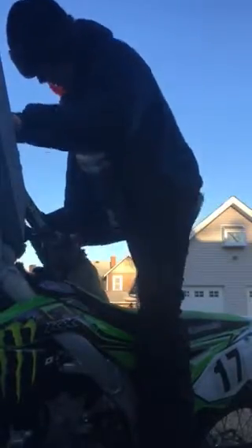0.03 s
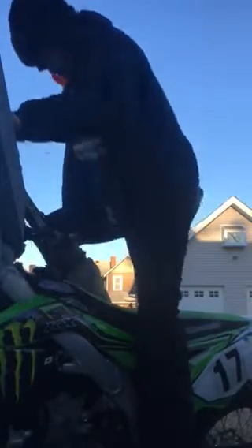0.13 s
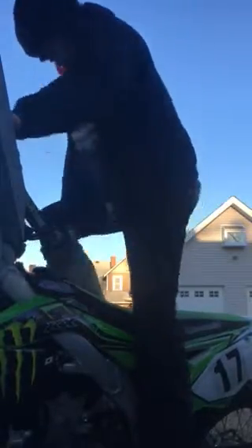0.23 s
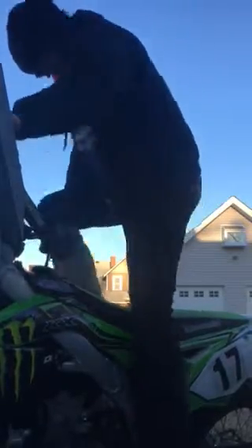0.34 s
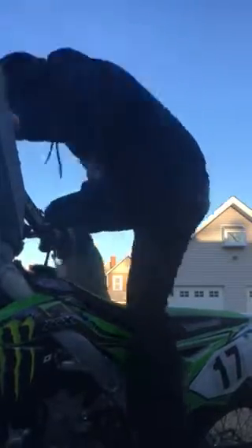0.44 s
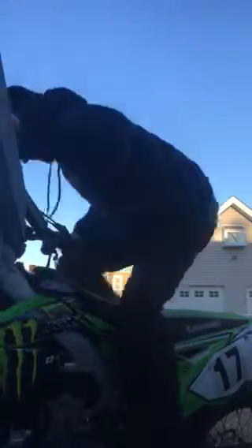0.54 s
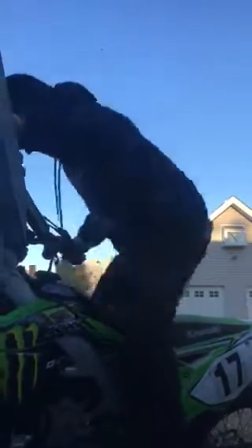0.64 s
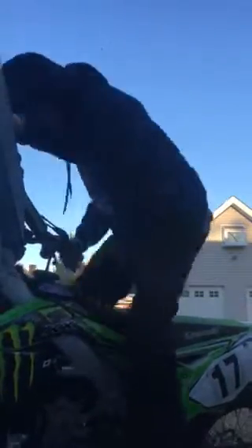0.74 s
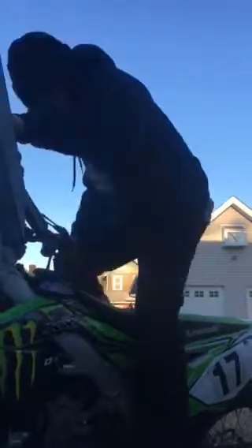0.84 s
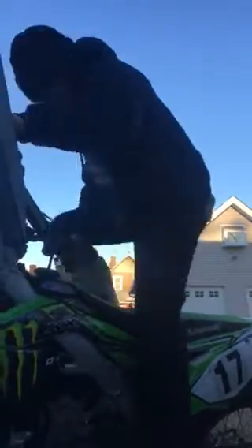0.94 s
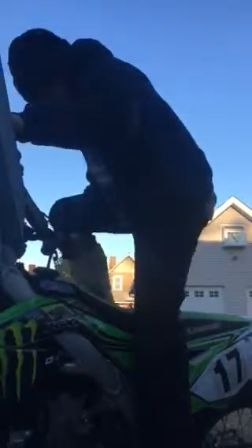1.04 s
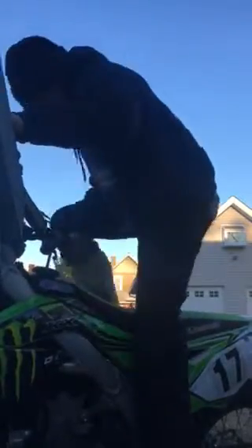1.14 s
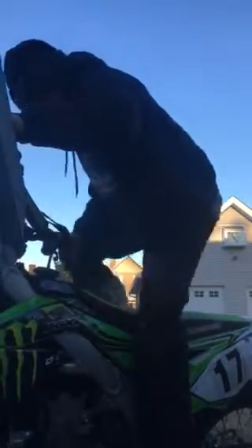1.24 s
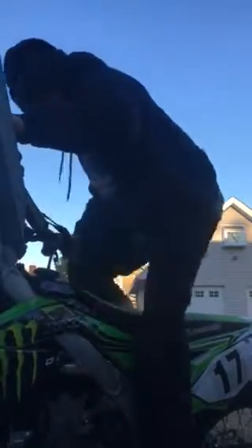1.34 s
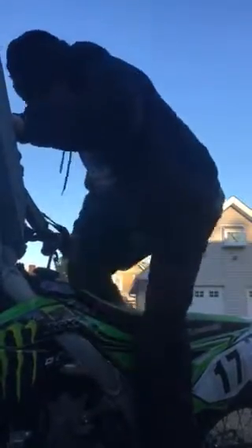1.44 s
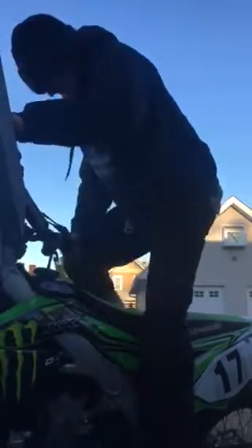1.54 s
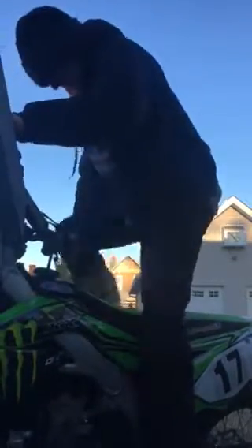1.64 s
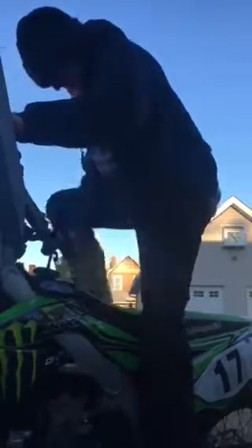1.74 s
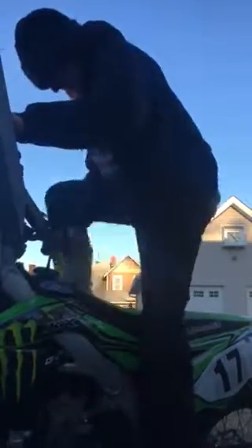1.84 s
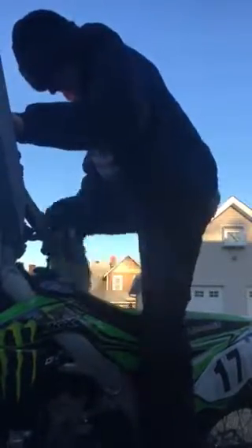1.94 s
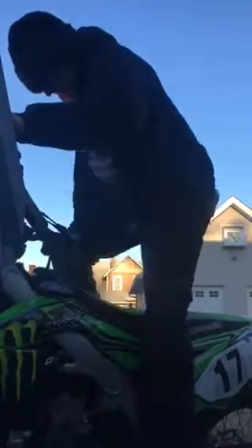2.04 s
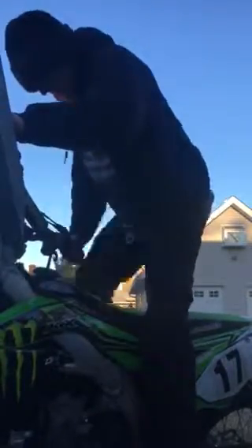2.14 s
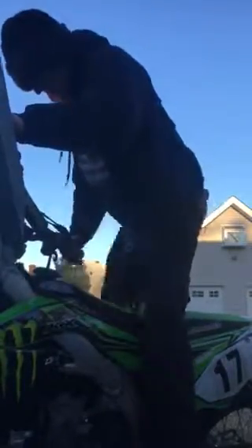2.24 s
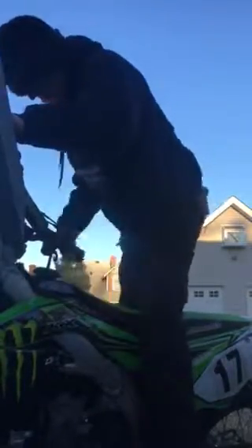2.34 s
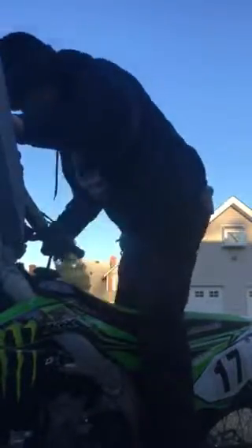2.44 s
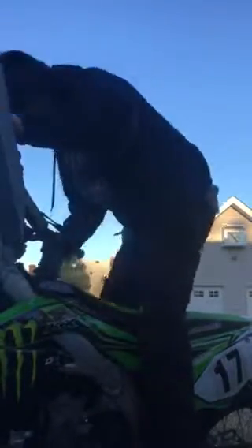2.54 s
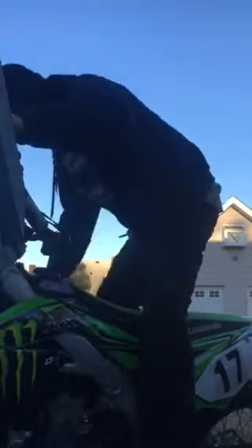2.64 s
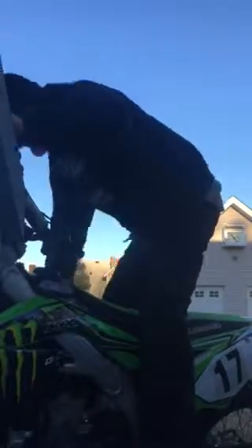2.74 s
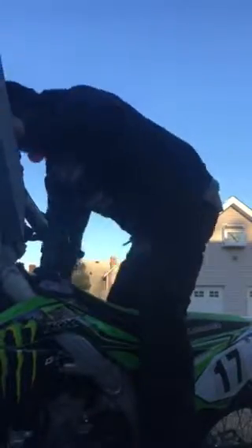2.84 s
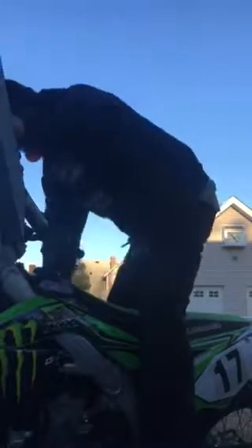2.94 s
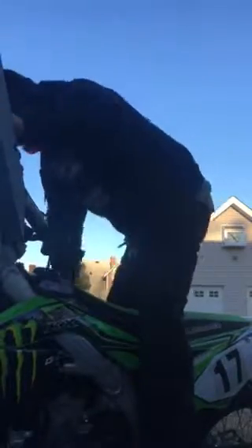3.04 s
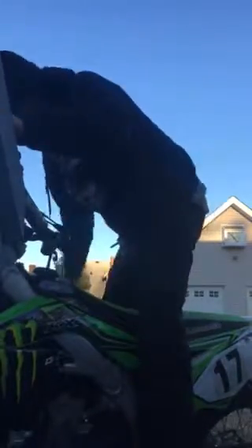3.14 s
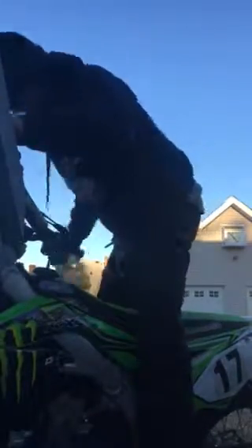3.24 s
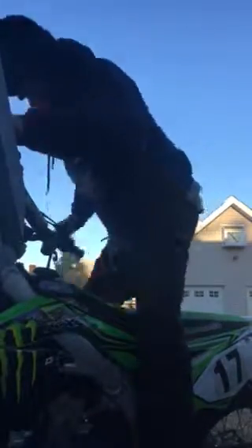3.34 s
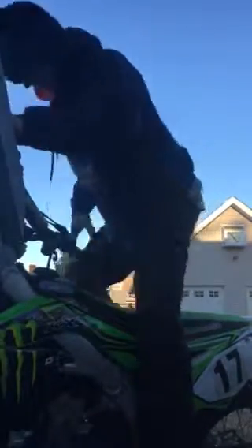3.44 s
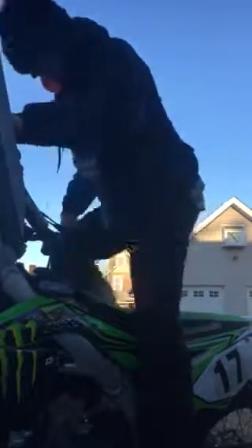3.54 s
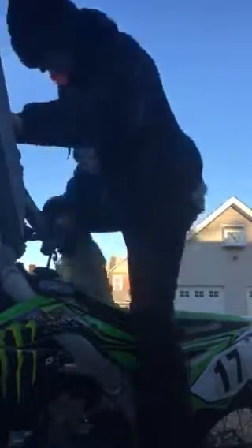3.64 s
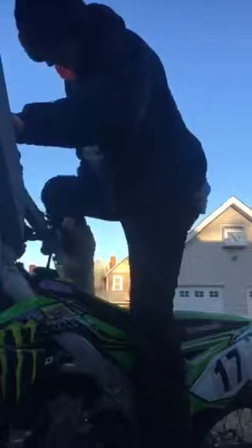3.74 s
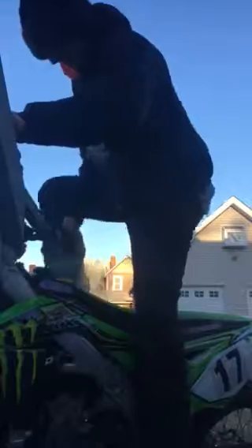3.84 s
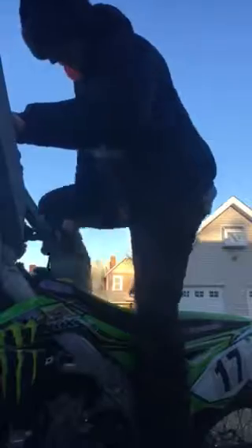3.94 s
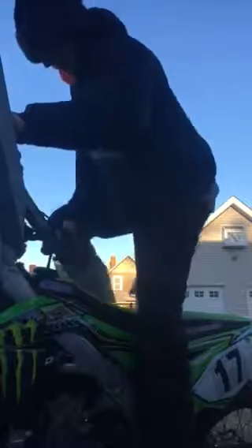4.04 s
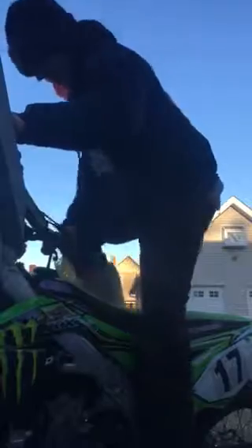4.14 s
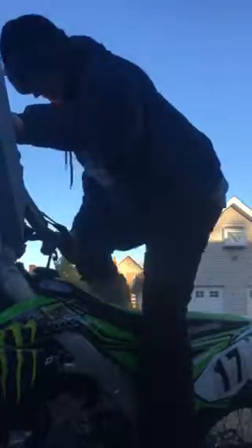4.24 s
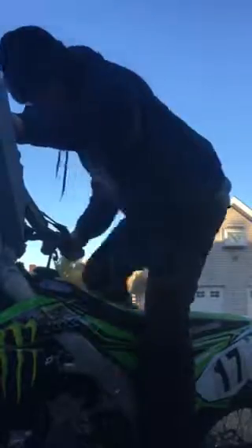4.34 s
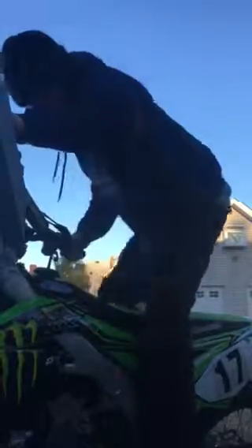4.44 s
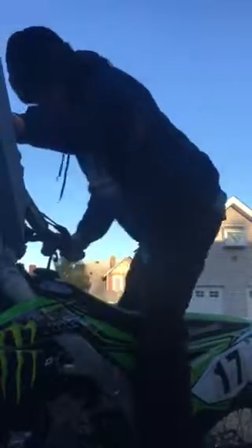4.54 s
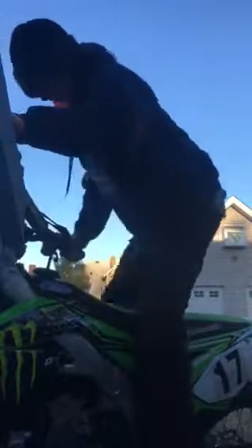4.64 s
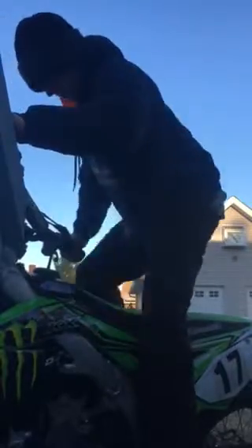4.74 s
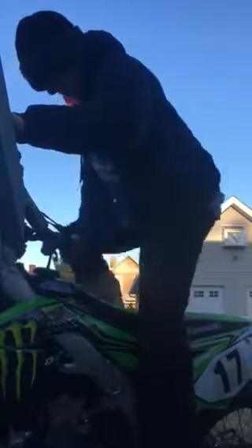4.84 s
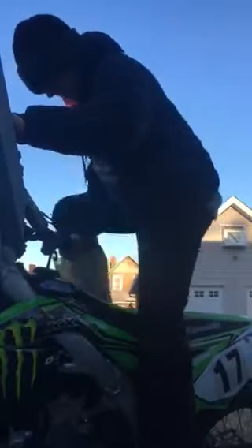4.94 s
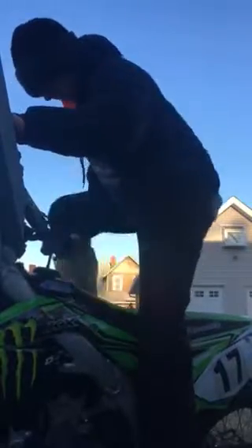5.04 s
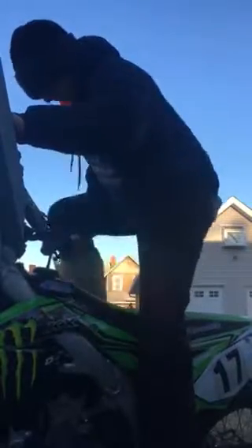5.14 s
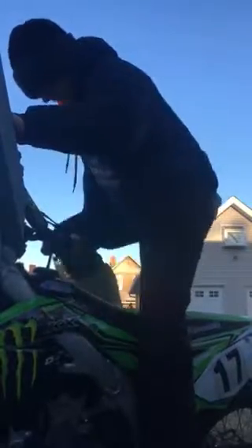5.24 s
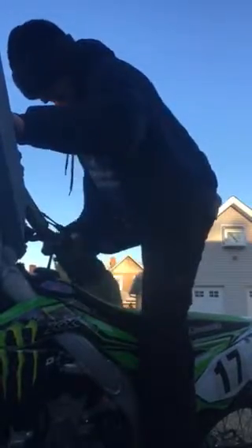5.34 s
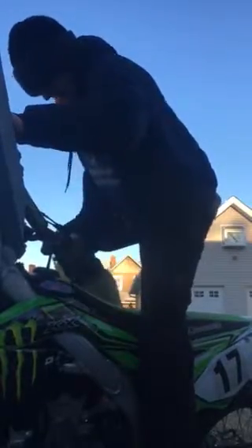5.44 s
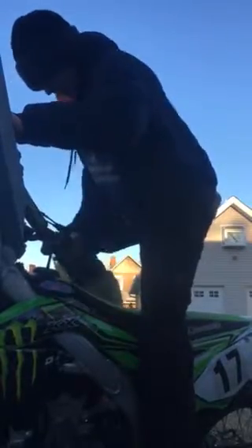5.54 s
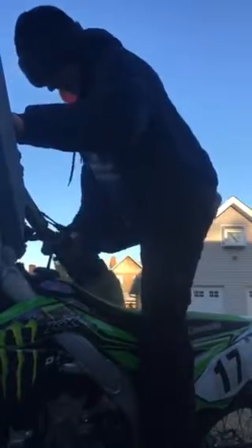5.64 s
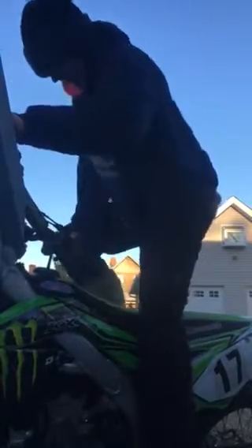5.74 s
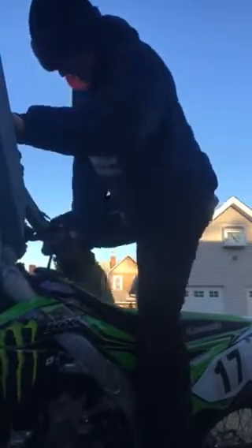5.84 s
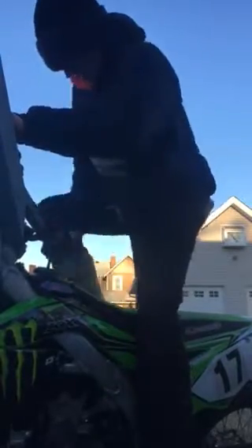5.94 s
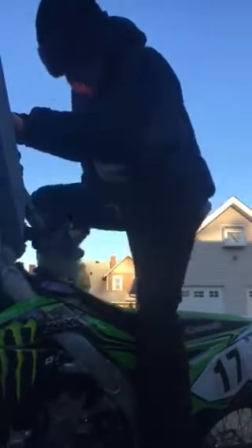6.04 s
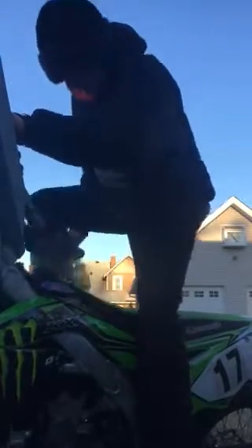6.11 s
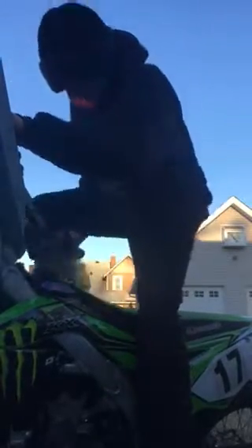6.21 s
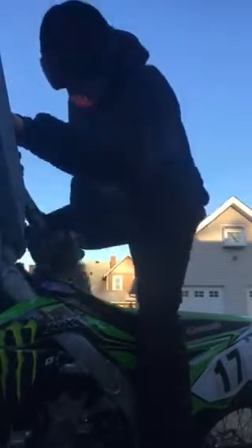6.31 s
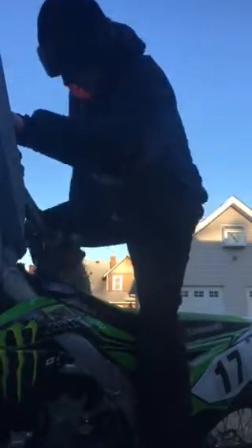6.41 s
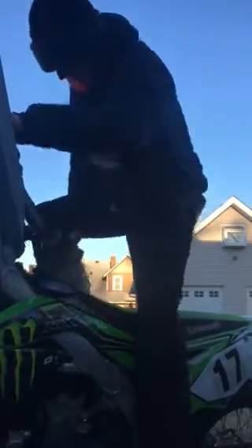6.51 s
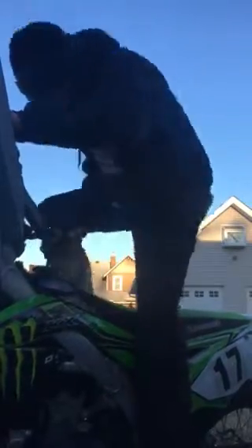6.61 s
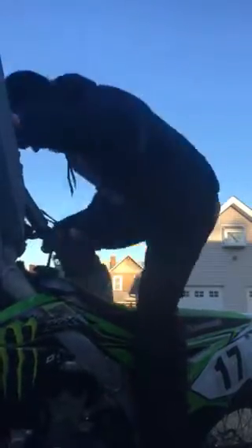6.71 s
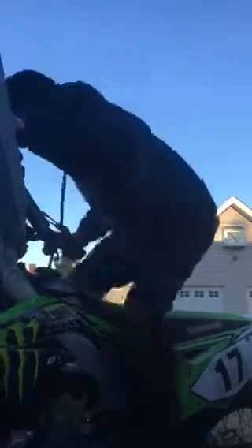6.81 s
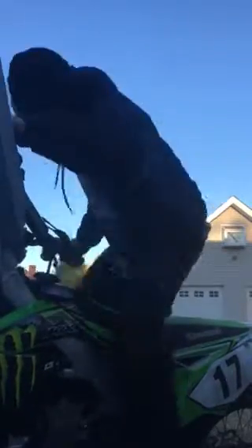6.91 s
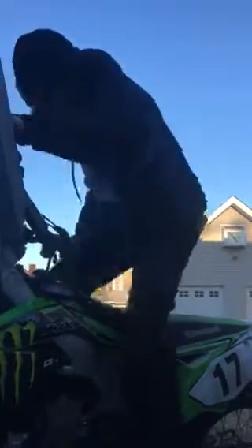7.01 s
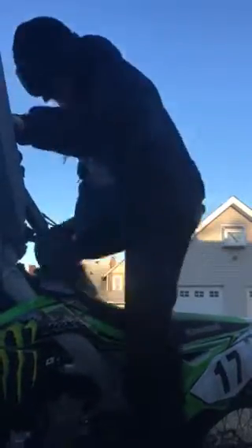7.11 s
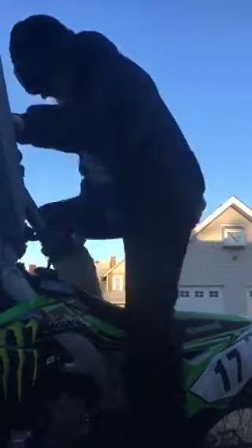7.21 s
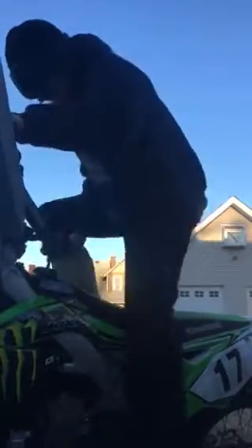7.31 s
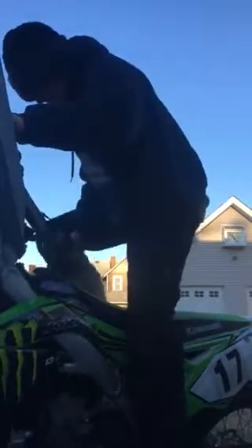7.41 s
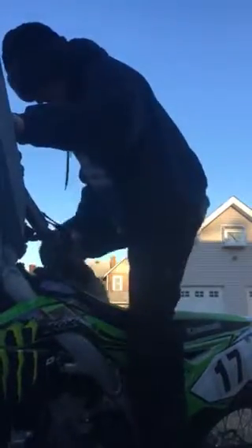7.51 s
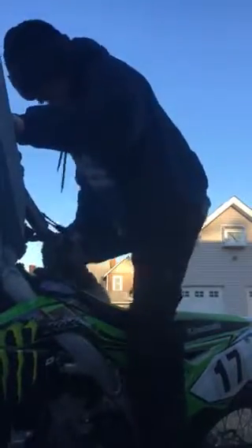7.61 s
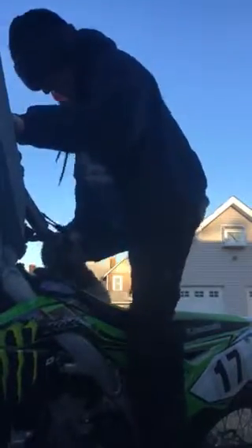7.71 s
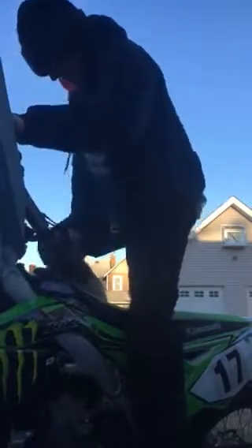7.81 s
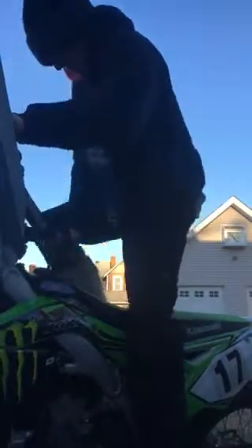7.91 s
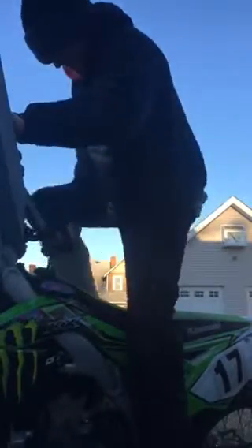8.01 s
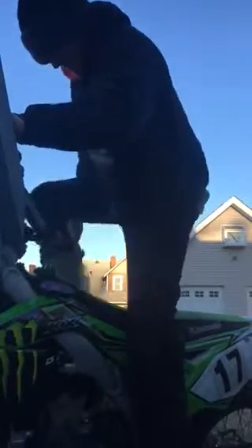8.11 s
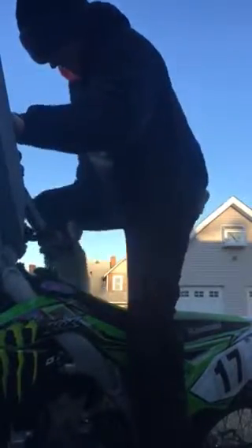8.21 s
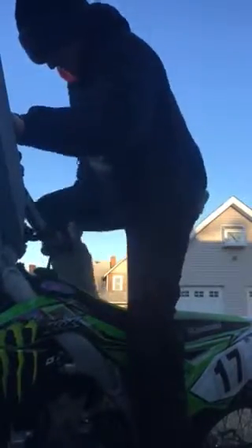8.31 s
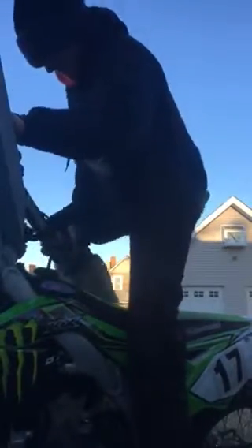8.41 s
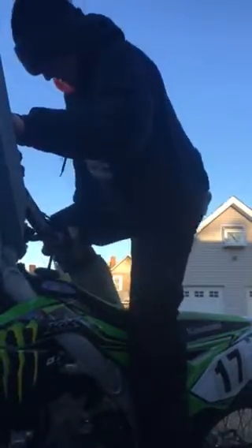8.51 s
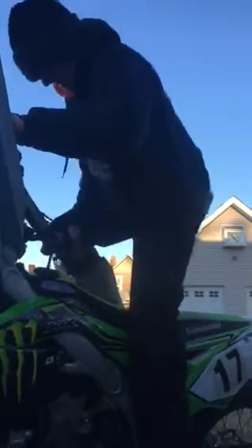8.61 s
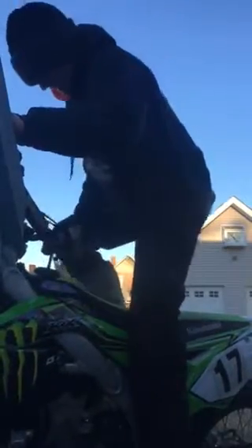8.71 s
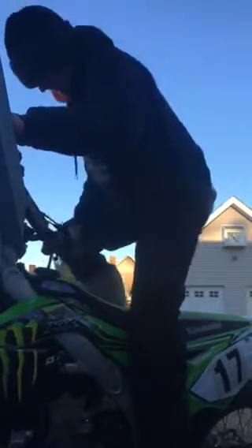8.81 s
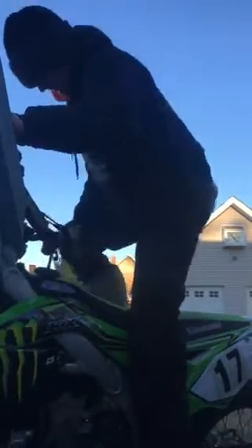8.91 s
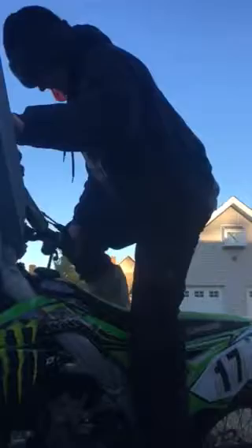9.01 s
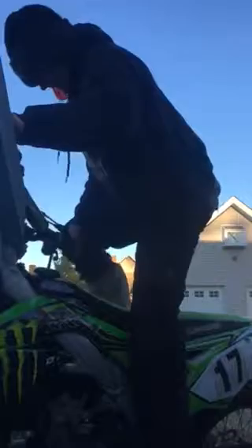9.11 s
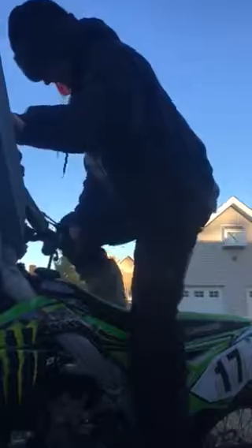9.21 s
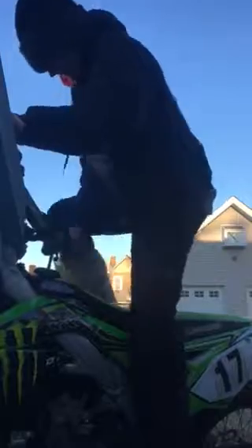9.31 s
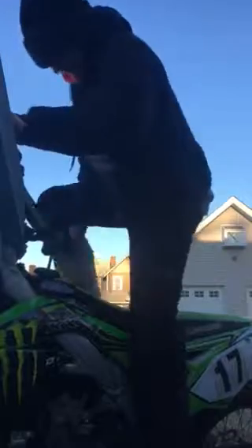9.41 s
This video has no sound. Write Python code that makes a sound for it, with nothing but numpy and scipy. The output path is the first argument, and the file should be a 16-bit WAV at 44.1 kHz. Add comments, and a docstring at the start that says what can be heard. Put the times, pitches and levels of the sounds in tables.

```python
"""A single-cylinder dirt bike is kicked over twice in a driveway; it never fires.
Each kick spins the gears, pushes a few muffled puffs through the exhaust and slams the lever on its
stop, ringing the frame. Between kicks the lever ratchets back, boot and linkage knock, the sole skids,
a jacket rustles and a small metal tag jingles. House fronts echo faintly; a street hums far off."""
import sys
import numpy as np
from scipy import signal
from scipy.fft import rfft, irfft
from scipy.io import wavfile
from scipy.ndimage import uniform_filter1d

SR = 44100
rng = np.random.default_rng(int(sys.argv[2]) if len(sys.argv) > 2 else 0)


def waveform_to_disk(signal):
    """Save audio, clipped to [-1, 1], as 16-bit WAV at the path in sys.argv[1]."""
    frames = np.transpose(np.atleast_2d(signal))
    scaled = np.clip(frames, -1, 1) * 32767
    samples = np.round(scaled).astype(np.int16)
    wavfile.write(sys.argv[1], SR, samples)


N = 417185
TIME = np.arange(N) / SR
TURN_S, TOP_SPEED_S = 0.094, 0.12  # one crank turn; first puff to top speed

# first puff of each kick: t/s
KICK_TIMES = [0.634, 6.859]
# spectrum of a knock on the bike: f/Hz, level/dB
KNOCK_SPECTRUM = [(60, -27), (170, -4), (300, 1.5), (560, -2.5), (900, -2.5), (1600, -2), (2700, -4.5),
                  (4800, -6.5), (7000, -7.5), (10500, -11.5), (12000, -17), (15500, -17)]
# spectrum of a pawl click: f/Hz, level/dB
CLICK_SPECTRUM = [(150, -14), (500, -3), (850, 1.5), (1700, 5.5), (2100, -4.5), (2700, 4), (5300, -0.5),
                  (7300, 4), (10200, -1.5), (11400, -2.5), (13000, -6.5), (15500, -10.5)]
# modes of the metal tag: f/Hz, level/dB, t60/s
TAG_MODES = [(4400, -12.5, 0.023), (7250, -11.5, 0.08), (8800, -5, 0.044), (9680, -3.5, 0.03),
             (11270, -1, 0.048), (11900, -11, 0.073), (12500, 4, 0.013)]


def amp(db):
    return 10 ** (np.asarray(db) / 20)


def unit(x):
    """Scales to rms 1."""
    return x / np.sqrt(np.mean(x ** 2) + 1e-20)


def decay(t, t60_s):
    return np.exp(-np.log(1000) * t / t60_s)


def swell(mid_s, half_s):
    return np.exp(-((TIME - mid_s) / half_s) ** 2)


def add(mix, at_s, sound):
    part = mix[max(round(at_s * SR), 0):][:len(sound)]
    part += sound[:len(part)]


def db_at(spectrum, hz):
    f, db = np.transpose(spectrum)
    return np.interp(np.log(hz + 1), np.log(f + 1), db)


def colour(x, spectrum):
    """Filters x by a spectrum; rms 1."""
    hz = np.fft.rfftfreq(len(x), 1 / SR)
    return unit(irfft(rfft(x) * amp(db_at(spectrum, hz)), len(x)))


def wander(max_hz):
    """Slow random drift, rms 1."""
    t = np.arange(0, N / SR + .01, .002)
    drift = sum(np.sin(2 * np.pi * (hz * t + rng.random())) for hz in max_hz * rng.uniform(.1, 1, 30))
    return np.interp(TIME, t, unit(drift))


def resonate(x, hz, width_hz):
    b, a = signal.iirpeak(hz, hz / width_hz, SR)
    return signal.lfilter(b, a, x)


def grains(per_s, spread_db):
    """Sparse clicks of uneven size, rms 1."""
    size = amp(spread_db * np.minimum(rng.exponential(1, N), 4))
    return unit(size * rng.standard_normal(N) * (rng.random(N) < per_s / SR))


def stick_slip(resonances, judder_db):
    """Surfaces stick and slip unevenly, driving a few steep resonances; rms 1."""
    slips = rng.standard_normal(N) * amp(judder_db * wander(max_hz=98))
    return unit(sum(amp(db) * resonate(resonate(slips, hz, width_hz), hz, width_hz)
                    for hz, width_hz, db in resonances))


def impact(spectrum, t60_s, bass_db=0, treble_db=0, tail_db=-27):
    """A crack excites dense modes over a faint after-ring; high ones rise and die first."""
    t, hz = np.arange(8192) / SR, np.fft.rfftfreq(8192, 1 / SR)
    top_db = min(1.3 * treble_db, .6 * treble_db)
    tilt_db = db_at([(450, bass_db), (850, 0), (1800, 0), (6000, treble_db), (14000, top_db)], hz)
    # each strike point favours other modes
    spot_db = 2.5 * np.interp(np.sqrt(hz), np.linspace(0, np.sqrt(SR / 2), 40), rng.standard_normal(40))
    modes = amp(db_at(spectrum, hz) + tilt_db + spot_db) * np.exp(2j * np.pi * rng.random(len(hz)))
    modes /= np.std(irfft(modes * (hz > 700) * (hz < 3500)))
    bands_hz = np.geomspace(200, 12800, 7)
    out = 0
    for band_hz, share in zip(bands_hz, np.eye(len(bands_hz))):
        band = irfft(modes * np.interp(np.log(hz + 1), np.log(bands_hz), share))
        stretch = (1000 / max(band_hz, 700)) ** 0.44  # time scale, 1 at 1 kHz
        rise = 1 - np.exp(-t / (0.00087 * stretch ** 2))
        fall = 0.58 * decay(t, 0.0026) + decay(t, t60_s * stretch) + amp(tail_db) * decay(t, 0.3)
        out = out + band * fall * rise
    return out


def knock(hardness_db, t60_s):
    """A blow on the bike: harder contact, more treble and less bass."""
    return impact(KNOCK_SPECTRUM, t60_s, bass_db=-5 - 0.74 * hardness_db, treble_db=hardness_db)


def boom(hz, rise_s, sharpness, overtone=0):
    """A low resonance swells and dies away."""
    t = np.arange(SR // 4) / SR
    envelope = (t / rise_s * np.exp(1 - t / rise_s)) ** sharpness
    phase = 2 * np.pi * hz * t
    return envelope * (np.sin(phase) + overtone * np.sin(2.4 * phase))


def street(wash_db=-51, drone_hz=79):
    """Distant wash; a wavering drone in a low rumble swells now and then."""
    # street wash: f/Hz, level/dB
    wash_spectrum = [(15, -37), (25, -9), (61, 1.5), (92, -4.5), (149, -8.5), (363, -17), (476, -20.5),
                     (641, -21.5), (1370, -26), (5000, -52), (6380, -48), (12500, -54), (16000, -48.5)]
    # drone swells: centre t/s, half length/s, level/dB
    swells = [(1.4, 0.48, -54.5), (4.2, 0.26, -49.5), (5.4, 0.3, -52), (6.33, .2, -42)]
    # rumble: f/Hz, level/dB
    rumble_spectrum = [(15, -31), (35, -6.5), (65, 5), (90, -2.5), (130, -5.5), (200, -24), (600, -58.5)]
    wash = amp(wash_db) * colour(rng.standard_normal(N), wash_spectrum)
    pitch_hz = drone_hz * (1 + 0.068 * wander(max_hz=7.4))
    tone = np.sqrt(2) * np.sin(2 * np.pi * np.cumsum(pitch_hz) / SR)
    rumble = colour(rng.standard_normal(N), rumble_spectrum)
    drone = tone * amp(2 * wander(max_hz=8.6) - 3.5) + amp(-6) * rumble
    gain = amp(-50.5) + sum(amp(db) * swell(s, half_s) for s, half_s, db in swells)
    return wash + gain * drone


def yard(x, wet_db=-24, low_t60_s=0.69, high_t60_s=0.78):
    """House fronts add a thin, scattered tail."""
    t = np.arange(SR) / SR
    onset = np.clip((t - .015) / .03, 0, 1)
    echoes = rng.standard_normal(SR) * (rng.random(SR) < .08) * onset
    low = signal.sosfilt(signal.butter(2, 3000, fs=SR, output="sos"), echoes)
    tail = low * decay(t, low_t60_s) + .5 * (echoes - low) * decay(t, high_t60_s)
    return x + amp(wet_db) * signal.fftconvolve(x, tail / np.linalg.norm(tail))[:N]


def movement(rise_s=0.11, settle_s=0.37):
    """Swish and rub gains: a floor, a jolt per kick, a swell per shift of weight."""
    # weight shifts: centre t/s, half length/s, swish level/dB, rub level/dB
    shifts = [(0.0, 0.085, -56, -45), (2.173, 0.043, -63, -68), (2.79, 0.34, -62, -58.5),
              (4.61, 0.83, -61, -56.5), (6.5, .35, -67, -62), (8.4, 0.2, -77.5, -67.5)]
    since_s = TIME - np.array(KICK_TIMES)[:, None] - TOP_SPEED_S
    jolt = np.exp(-np.maximum(-since_s / rise_s, since_s / settle_s)).sum(0)
    swish = amp(-71) + amp(-43.5) * jolt + sum(amp(db) * swell(s, half) for s, half, db, _ in shifts)
    rub = amp(-60) + amp(-38.5) * jolt + sum(amp(db) * swell(s, half) for s, half, _, db in shifts)
    return swish, rub


def rider(flutter_db=3.5):
    """The jacket swishes and crinkles; boot and seat rub lower down."""
    # jacket: f/Hz, level/dB
    swish_spectrum = [(1180, -38), (2000, -2), (2620, -0.5), (3310, -3), (4380, 1), (4940, -10),
                      (7120, -5.5), (10400, -15), (11400, -6), (16000, -21)]
    # boot and seat: f/Hz, level/dB
    rub_spectrum = [(76, -26), (130, 4.5), (186, -4), (274, 5.5), (502, -4.5), (1070, -5), (1190, -11),
                    (1470, -4.5), (2930, -26), (3500, -23), (4550, -53.5), (7700, -120)]
    strokes = amp(flutter_db * wander(max_hz=23))
    crinkles = grains(per_s=120, spread_db=2)
    swish = colour(rng.standard_normal(N) + amp(-8) * crinkles, swish_spectrum)
    rub = colour(rng.standard_normal(N) + .4 * crinkles, rub_spectrum)
    swish_gain, rub_gain = movement()
    return strokes * (amp(-4) * swish_gain * swish + amp(-2) * rub_gain * rub)


def loose_parts(ref_db=-58):
    """Small parts tick and the tag tinkles faintly as the rider moves."""
    ticks = np.zeros(N)
    for _ in range(4):
        hits = grains(per_s=7, spread_db=0.5)
        ticks += signal.oaconvolve(hits, impact(CLICK_SPECTRUM, t60_s=0.027, treble_db=7.5))[:N]
    tinkles = sum(amp(db / 2) * resonate(grains(per_s=3.7, spread_db=7.5), hz, 2.7 / t60_s)
                  for hz, db, t60_s in TAG_MODES)
    swish_gain, _ = movement()
    shake = amp(ref_db) * (swish_gain / amp(ref_db)) ** 0.94
    return shake * (amp(-3.5) * unit(ticks) + amp(-11) * unit(tinkles))


def sizzle(level_db=-64.5):
    """Thin metallic friction while the rider reaches down."""
    # resonances: f/Hz, width/Hz, level/dB
    resonances = [(3000, 900, 0), (5350, 1000, -4), (8650, 800, -13)]
    return amp(level_db) * swell(mid_s=2.88, half_s=0.22) * stick_slip(resonances, judder_db=2.5)


def tag(uneven_db=4, detune=0.0034):
    """A metal tag swings against clothing; each touch rings a new mix of modes, chattering."""
    # touches: t/s, level/dB
    touches = [(0.577, -29.5), (0.683, -24.5), (0.997, -33.5), (1.4531, -33), (1.8043, -32), (2.3876, -31),
               (2.537, -30.5), (2.8398, -32.5), (3.501, -37), (4.2765, -30), (4.566, -30), (4.7551, -30.5),
               (5.0838, -24), (5.4107, -30.5), (5.736, -38.5), (5.921, -44), (6.025, -33), (6.271, -49.5),
               (6.4843, -35.5), (7.004, -19.5), (7.309, -24)]
    t, out = np.arange(SR // 8) / SR, np.zeros(N)
    hz, db, t60_s = np.transpose(TAG_MODES)[:, :, None]
    envelope = decay(t, t60_s) * (1 - np.exp(-t / 0.00056))
    for s, touch_db in touches:
        mix, shift, phase = rng.standard_normal((3, len(TAG_MODES), 1))
        size = amp(db + uneven_db * mix)
        chatter = 1 + unit(uniform_filter1d(rng.standard_normal(envelope.shape), size=70))
        tones = np.sin(2 * np.pi * (hz * (1 + detune * shift) * t + phase))
        ring = (size * chatter * envelope * tones).sum(0)
        add(out, s, amp(touch_db + 1) * ring / np.linalg.norm(size))
    return out


def boot_skid():
    """The sole skids on the lever and squeals."""
    # skid envelope: t/s, level/dB
    envelope = [(4.35, -68), (4.418, -44.5), (4.428, -33.5), (4.46, -32.5), (4.51, -35.5), (4.517, -43.5),
                (4.6, -50)]
    # squeal resonances: f/Hz, width/Hz, level/dB
    resonances = [(394, 390, 7.5), (1645, 96, 8.5), (2250, 840, -4), (4380, 650, -0.5), (5300, 720, -3.5),
                  (6000, 350, -3.5), (8100, 3500, -10), (11550, 390, -6), (14500, 3000, -16)]
    times_s, db = np.transpose(envelope)
    return np.interp(TIME, times_s, amp(db), left=0, right=0) * stick_slip(resonances, judder_db=2)


def boot_scuffs(delay_s=0.594, hold_s=0.19, fade_s=0.048, level_db=-53):
    """The boot slides back onto the lever after each kick."""
    # scuff resonances: f/Hz, width/Hz, level/dB
    resonances = [(1420, 180, 5), (2150, 550, -1.5)]
    times_s = delay_s + np.array([-fade_s, 0, hold_s, hold_s + fade_s])
    gate = sum(np.interp(TIME - s, times_s, [0, 1, 1, 0]) for s in KICK_TIMES)
    return amp(level_db) * gate * stick_slip(resonances, judder_db=4.5)


def thuds():
    """Hollow parts thud under the rider's weight."""
    # thuds: t/s, level/dB, f/Hz
    hits = [(.630, -19.5, 266), (0.78, -11, 314), (2.382, -25, 272), (2.673, -30.5, 686), (3.376, -31, 420),
            (4.260, -28, 143), (4.581, -24.5, 308), (6.872, -25.5, 270), (7.113, -18.5, 221)]
    out = np.zeros(N)
    for s, db, hz in hits:
        add(out, s, amp(db) * boom(hz, rise_s=0.0034, sharpness=0.65, overtone=0.23))
    return out


def frame(x):
    """Whatever strikes or turns in the bike rings its frame; the low plastic panels are well damped."""
    # modes of cases, frame and panels: f/Hz, level/dB
    modes = [(322, -6.5), (432, -2), (726, -3.5), (788, -0.5), (938, -5.5), (1037, -1.5), (1153, -6),
             (1338, -15), (1491, -2), (2115, -17), (2259, -2), (2439, -5), (2599, -5), (2739, -7)]
    return 0.82 * x + sum(amp(db) * resonate(x, hz, width_hz=45 if hz < 500 else 24) for hz, db in modes)


def linkage_slack(count=24):
    """Slack in the linkage taps faintly at random moments."""
    out, slot_s = np.zeros(N), N / SR / count
    for slot, (size, contact) in enumerate(rng.standard_normal((count, 2))):
        tap = knock(hardness_db=-5 + 4 * contact, t60_s=.05)
        add(out, (slot + rng.random()) * slot_s, amp(-49 + 0.5 * size) * tap)
    return out


def ratchet(tooth_s=0.0422):
    """The pawl slips over its teeth as the lever swings back."""
    # runs of clicks: t/s, tooth count, level/dB
    runs = [(.204, 1, -42), (.458, 1, -42.5), (0.88, 1, -30.5), (1.197, 1, -39), (1.35, 1, -37.5),
            (2.464, 1, -39), (3.635, 1, -44), (4.790, 1, -40.5), (4.833, 5, -28), (5.082, 1, -33.5),
            (7.061, 2, -27), (8.211, 1, -44), (8.893, 1, -44)]
    out = np.zeros(N)
    for s, count, db in runs:
        for tooth in range(round(count)):
            add(out, s + tooth * tooth_s, amp(db - 1) * impact(CLICK_SPECTRUM, t60_s=0.048, tail_db=-25))
    return out


def lever_knocks():
    """Lever, boot and linkage strike the bike; dull blows ring longer than bright ones."""
    # blows: t/s, level/dB, hardness (treble re middle)/dB
    blows = [(0.213, -40, 1), (0.3895, -35, -4.5), (0.4156, -36.5, -2), (0.562, -21.5, -4),
             (0.6308, -27.5, -8), (0.716, -10.5, -1.5), (0.74, -15, -5), (0.7665, -15.5, -3.5),
             (0.7704, -8, 0), (0.7749, -12.5, -4.5), (1.0078, -34.5, 3), (1.0609, -32.5, 12.5),
             (1.2505, -29, -5.5), (1.544, -39, -1), (1.74, -34.5, 6), (1.7952, -31, 9),
             (1.805, -36.5, -1.5), (1.8402, -33, -0.5), (2.376, -31.5, -13), (2.5363, -37, -13.5),
             (2.6677, -36, -9), (2.84, -41, 11), (2.9744, -42, -8), (3.12, -39.5, -7.5),
             (3.3722, -34.5, -15), (3.5009, -43.5, -9), (4.034, -28.5, -3.5), (4.127, -35, -11),
             (4.2843, -40, -2), (4.5774, -33, -16), (5.2828, -28.5, -6.5), (5.564, -37.5, -3),
             (6.0247, -24.5, 4), (6.082, -39.5, -5), (6.1828, -42, -10.5), (6.3781, -38, -9),
             (6.5118, -40, -14), (6.5716, -35.5, -0.5), (6.5878, -37.5, -5.5), (6.8518, -26, -8.5),
             (6.955, -14, -1.5), (6.958, -11, 2), (6.973, -17.5, -2.5), (7.109, -20.5, -10),
             (7.2944, -27, 8), (8.0202, -31, 11), (8.0817, -37.5, -6), (8.2539, -35, -8.5), (8.45, -42, 7),
             (8.4772, -33.5, -11), (8.524, -32.5, 4.5), (8.6795, -39, 2), (8.7935, -41.5, 14),
             (9.331, -38, -6.5)]
    out = np.zeros(N)
    for s, db, hardness_db in blows:
        add(out, s, amp(db) * knock(hardness_db, t60_s=0.06 * amp(-0.5342 * hardness_db)))
    return out


def crank_gain(lead_s=0.075, coast_s=0.135, stall_s=0.07, rise_db_per_s=90, fall_db_per_s=30):
    """Each kick speeds the crank up; it coasts, then stalls on compression, labouring once a turn."""
    run_up_s = lead_s + TOP_SPEED_S
    times_s = np.cumsum([-lead_s, run_up_s, coast_s, stall_s])
    arch_db = -25 + np.array([-rise_db_per_s * run_up_s, 0, -fall_db_per_s * coast_s, -34])
    since_s = TIME - np.array(KICK_TIMES)[:, None]
    chug_db = 1.5 * np.cos(2 * np.pi * (since_s - TOP_SPEED_S) / TURN_S)
    return amp(np.interp(since_s, times_s, arch_db, left=-np.inf, right=-np.inf) + chug_db).sum(0)


def engine_spin(uneven_db=3):
    """Air rushes and gears overrun the starter ratchet; a faster crank is louder, its clicks closer."""
    # gears, chain and intake: f/Hz, level/dB
    spectrum = [(100, 14.5), (200, 7.5), (300, 7.5), (550, -4), (1100, -4), (1700, 3.5), (2200, -8),
                (4000, -1.5), (6300, -6), (9000, -5.5), (10600, -14.5), (11700, -6), (15500, -15.5)]
    gain = crank_gain()
    teeth_per_s = 105 * (gain / amp(-28)) ** .35
    teeth_passed = np.floor(np.cumsum(teeth_per_s) / SR)
    teeth = np.zeros(N)
    for s in TIME[np.diff(teeth_passed, prepend=0) > 0]:
        size = amp(uneven_db * rng.standard_normal())
        add(teeth, s, size * impact(spectrum, t60_s=0.033, treble_db=-2.5))
    teeth /= np.std(teeth[gain > 0])
    rush = amp(-7) * colour(rng.standard_normal(N), spectrum)
    return gain * (rush + teeth)


def exhaust(pipe_hz=77, puff_db=-14, rebound_db=-12, rebound_s=0.024):
    """One puff per crank turn, strongest near top speed, where the pipe booms a second time."""
    # single puffs as the piston is eased over: t/s, level/dB
    slow_puffs = [(1.318, -28.5), (4.186, -30), (4.515, -25)]
    out, puff = np.zeros(N), boom(pipe_hz, rise_s=0.015, sharpness=1.8)
    for s in KICK_TIMES:
        for after_s in TURN_S * np.arange(4):
            drop_db = ((after_s - TOP_SPEED_S) / 0.072) ** 2
            add(out, s + after_s, amp(puff_db - drop_db) * puff)
        add(out, s + TURN_S + rebound_s, amp(rebound_db) * puff)
    for s, db in slow_puffs:
        add(out, s, amp(db) * puff)
    return out


def scene():
    """Bike, friction and tag echo in the yard; loose parts, rider and street stay dry."""
    bike = frame(lever_knocks() + ratchet() + linkage_slack() + engine_spin()) + exhaust() + thuds()
    friction = boot_skid() + boot_scuffs() + sizzle()
    return (yard(bike + friction + tag()) + loose_parts() + rider() + street())[None]


def record(dry):
    """The microphone loses the deepest bass, rounds off peaks and limits the band."""
    low_hz, high_hz, ceiling = 30, 15950, .8
    heard = signal.sosfilt(signal.butter(2, low_hz, "highpass", fs=SR, output="sos"), dry)
    rounded = ceiling * np.tanh(heard / ceiling)
    lowpass = signal.firwin(511, high_hz, window=("kaiser", 9), fs=SR)
    return signal.oaconvolve(rounded, lowpass[None], "same")


dry = scene()
out = record(dry)
waveform_to_disk(out)
```